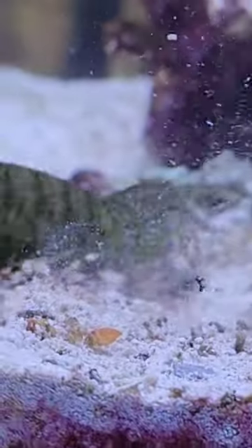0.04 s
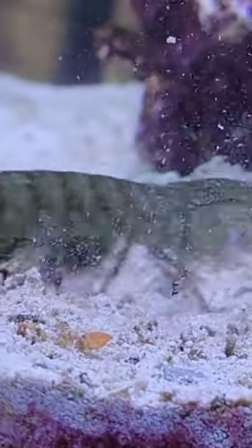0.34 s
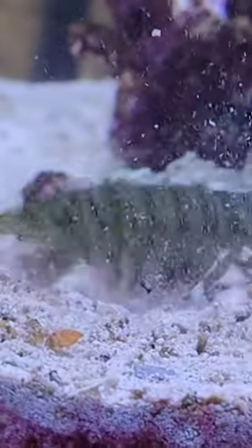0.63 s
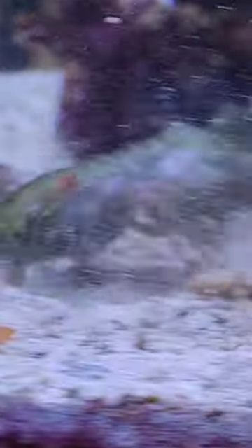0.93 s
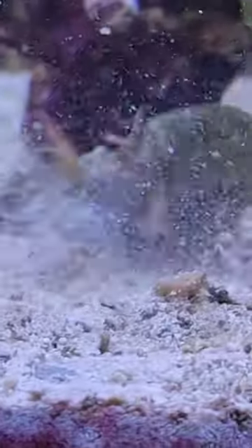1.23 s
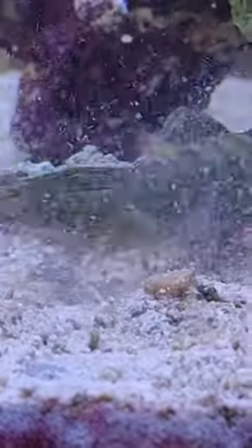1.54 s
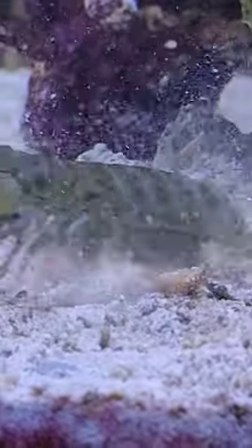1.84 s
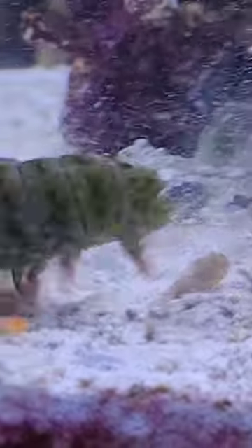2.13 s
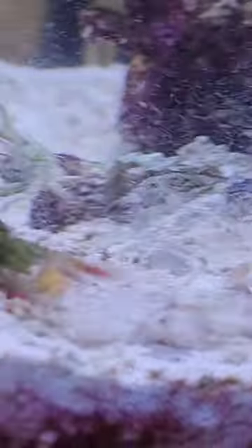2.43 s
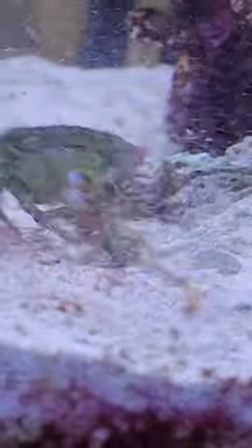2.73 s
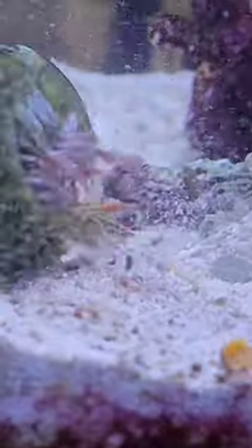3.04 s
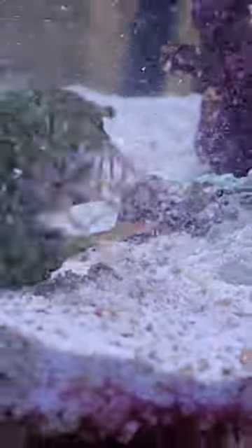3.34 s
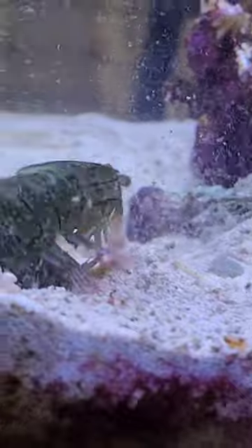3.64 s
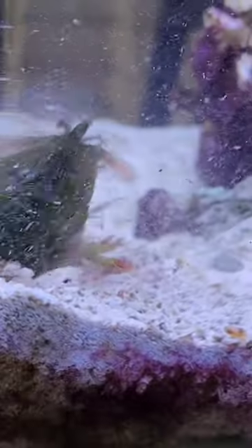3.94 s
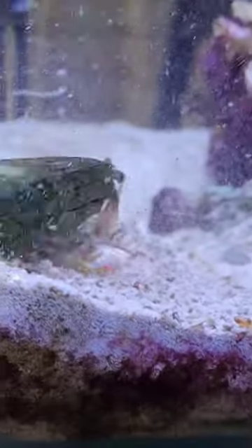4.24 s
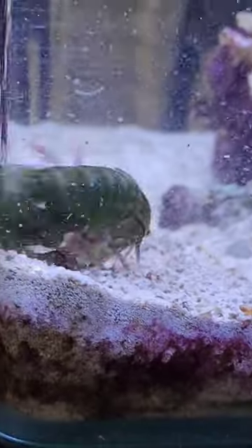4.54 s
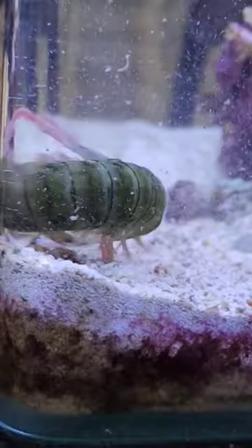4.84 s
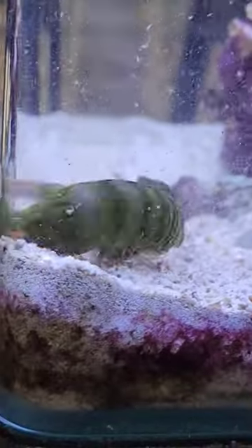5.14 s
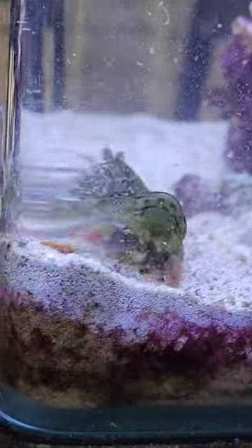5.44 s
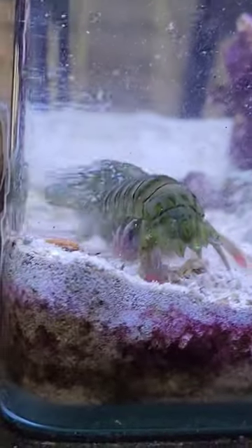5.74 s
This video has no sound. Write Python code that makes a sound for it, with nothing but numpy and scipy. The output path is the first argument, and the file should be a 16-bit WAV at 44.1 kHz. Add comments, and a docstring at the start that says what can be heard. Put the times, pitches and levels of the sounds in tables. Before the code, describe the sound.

Close to a home aquarium in a small room, a pump hums and rumbles throughout under a soft wash of water. A mantis shrimp strikes its food five times, roughly a second apart, each a sharp snap that rings briefly in the glass, the last one the loudest. In between, water swishes and gurgles, tiny bubbles trickle, sand ticks faintly and the stand gives a few dull thumps.

```python
"""Mantis shrimp in an aquarium

A mantis shrimp strikes its food five times, close by. Its club hits and a bubble collapses just
after; both snaps ring the glass panes and echo in a small room. Underneath, a pump hums and
rumbles, the stand thumps, moving water swishes and trickles with tiny bubbles, and sand ticks."""
import sys
import numpy as np
from scipy import signal
from scipy.fft import rfft, irfft
from scipy.io import wavfile
from scipy.ndimage import uniform_filter1d

SR = 44100
rng = np.random.default_rng(int(sys.argv[2]) if len(sys.argv) > 2 else 0)


def wav_out(sig):
    """Save sig, one row per channel (or a flat mono array), as 16-bit PCM at SR to the path in sys.argv[1]."""
    wavfile.write(sys.argv[1], SR, np.round(np.clip(np.atleast_2d(sig).T, -1, 1) * 32767).astype(np.int16))


N = 255780
TIME = np.arange(N) / SR
FREQS = np.maximum(np.arange(N // 2 + 1) * SR / N, 1)
TOP_HZ = 15700

# How alike left and right sound. Each row: frequency in Hz, likeness (0 unrelated, 1 the same).
LIKENESS_BY_HZ = [(60, 1), (130, 0.96), (290, 0.73), (640, 0.42), (1400, 0), (4000, 0)]
# The pump's hum, the stand's rumble, the cabinet's drone. Each row: time in seconds, relative dB.
HUM_LEVELS = [(0, -36), (3.5, -37.5), (4.6, -42.5), (5.8, -42.5)]
STAND_LEVELS = [(0, -28.5), (0.4, -29.5), (0.65, -32), (0.903, -28.5), (1.15, -30), (1.649, -29),
                (2.03, -25.5), (2.2, -29.5), (2.5, -26.5), (2.78, -26), (2.98, -24.5), (3.15, -32.5),
                (3.5, -29), (3.88, -37.5), (4.103, -32.5), (4.85, -30.5), (5.8, -32.5)]
CABINET_LEVELS = [(0, -41), (1.35, -43), (1.6, -35), (1.9, -42.5), (2.55, -31.5), (3.05, -43), (3.35, -35),
                  (4.5, -47), (5.3, -41), (5.8, -46.5)]
# Where stand, cabinet and water-filled tank ring. Each row: pitch in Hz, width in Hz, relative dB.
STAND_RINGS = [(52, 5.7, -4.5), (69.1, 24.5, 2), (90, 41, -24.5)]
CABINET_RINGS = [(115.6, 11.8, -3.5), (138, 32, -5.5), (185.5, 21, -8), (213.6, 7.3, -15)]
TANK_RINGS = [(990, 33, 7), (1130, 98, 7.5), (1334, 103, 8.5), (1486, 54, 9), (1870, 90, 5),
              (2108, 110, 8.5), (2400, 120, -5), (2620, 700, -7.5), (3554, 250, -3), (4166, 160, 3),
              (4840, 65, -5), (6080, 320, -2), (6840, 370, -4), (7730, 370, 3), (9500, 480, 1.5),
              (11300, 400, 1), (12100, 500, -3), (13100, 600, 1), (14700, 400, -1)]
# Dull thumps in the stand. Each row: middle in seconds, peak level in dB, pitch in Hz.
STAND_THUMPS = [(0.805, -22.5, 66), (1.535, -20, 72), (1.695, -18.5, 62), (2.59, -18.5, 70),
                (2.755, -16.5, 68), (2.865, -18, 72), (3.52, -18, 62), (5.352, -22.5, 62)]
# The tone of the steady wash and of the gush. Each row: frequency in Hz, relative dB.
WASH_TONE = [(20, -9), (35, 5), (100, -4.5), (200, -4.5), (320, -4), (420, -9), (550, -8), (900, -15),
             (1350, -17), (1800, -26.5), (2500, -33), (4500, -39), (7500, -39.5), (10500, -52),
             (14500, -45.5), (16000, -55)]
GUSH_TONE = [(100, -24), (220, -3.5), (320, 2), (450, -8), (650, -8.5), (1100, -16.5), (2000, -33),
             (5000, -68)]
# The strength of the steady wash. Each row: time in seconds, relative dB.
WASH_LEVELS = [(0, 5), (.8, 3.5), (1.6, 2), (2.5, 5), (3.2, 2.5), (4.3, 2), (5.1, 0.5), (5.8, 1)]
# Hollow swishes of water. Each row: middle and half length in seconds; the wash's centre in Hz,
# width in Hz and relative dB; the ring's pitch in Hz, glide in Hz per second and relative dB.
WATER_SWISHES = [(0.13, 0.12, 1080, 400, -50, 1150, -2, -56),
                 (0.425, 0.043, 890, 450, -46, 875, -100, -41.5),
                 (0.51, 0.093, 680, 506, -41.5, 612, -31, -42),
                 (0.741, 0.073, 840, 488, -45, 935, -400, -47), (0.98, 0.081, 665, 400, -52, 530, 102, -53),
                 (1.212, 0.05, 940, 300, -43, 990, -200, -45.5),
                 (1.36, 0.06, 920, 450, -49, 808, -200, -46), (1.72, 0.079, 1080, 400, -51, 1031, -1, -49),
                 (2.937, 0.12, 645, 300, -44, 635, 2, -61), (3.417, 0.094, 338, 151, -46, 335, 0.5, -43),
                 (3.738, .07, 640, 260, -42.5, 686, -2.5, -59),
                 (4.81, 0.11, 574, 352, -38, 533.4, -110, -39),
                 (5.005, 0.092, 576, 390, -38.5, 506, -38.5, -37),
                 (5.283, 0.21, 260, 103, -42, 215, -0.5, -49), (5.46, 0.17, 610, 290, -48, 670, 0, -49),
                 (5.505, 0.016, 775, 300, -58, 832, 351, -42.5),
                 (5.65, 0.16, 640, 340, -47.5, 1086, -150, -55)]
# The clearest bubbles. Each row: start in seconds, relative dB, pitch in Hz.
CLEAR_BUBBLES = [(0.3226, -50, 2720), (0.685, -43.5, 2590), (0.7532, -47, 2665), (1.031, -45, 2780),
                 (1.107, -50, 2600), (1.203, -47, 2400), (1.837, -45, 2950), (3.14, -45.5, 3060),
                 (3.473, -47, 2880), (4.2667, -46, 2750), (5.092, -46, 3040), (5.422, -48, 2810),
                 (5.642, -45.5, 1950)]
# Scraping sand and shell. Each row: start in seconds, relative dB, centre in Hz,
# reach (the band's top edge divided by its centre).
SAND_SCRAPES = [(0.358, -47.5, 12000, 1.16), (0.897, -59, 12000, 1.25), (1.39, -52, 12900, 1.1),
                (2.036, -54, 7000, 1.04), (2.09, -49, 7300, 1.05), (2.1, -55, 14000, 1.1),
                (2.347, -50.5, 12000, 1.5), (2.5, -55, 13500, 1.15), (2.686, -48, 6100, 1.03),
                (2.799, -56, 4470, 1.03), (4.18, -61, 6500, 1.3), (4.555, -50.5, 6200, 1.03),
                (5.088, -45.5, 7400, 1.05), (5.263, -45.5, 10900, 1.8)]
# The strikes. Each row: start in seconds; relative dB of knock, clack, click, ping, crack and
# sizzle; then the second snap and the first echo, in dB against the first snap.
CLUB_STRIKES = [(1.2768, -38, -39.5, -32.5, -37, -31, -30.5, -5.5, -5),
                (2.2297, -32, -33, -30.5, -44, -28, -34, -17, -6.5),
                (3.3011, -34.5, -35, -35, -37.5, -37.5, -35.5, -25, -6.5),
                (3.9515, -30.5, -28.5, -30, -50, -42, -45, -13, -16),
                (4.9024, -23, -20, -28.5, -36, -36, -31.5, -6.5, -18)]
# The six ranges, knock to sizzle. Each row: low edge in Hz, high edge in Hz, left minus right in dB.
SNAP_BANDS = [(880, 1680, .5), (1680, 3000, 4), (3000, 5200, 1.5), (5700, 6700, 3.5), (6700, 8600, 2),
              (9200, 15500, 5.5)]
# The struck shell, one row a strike. Each row: pitch in Hz and level in dB of one note, then another.
SHELL_NOTES = [(6860, -26, 6600, -22.5), (4380, -21.5, 7000, -28), (5900, -25, 9400, -28),
               (1550, -22, 4420, -27), (2120, -14.5, 2660, -15)]


def undb(db):
    """Turn decibels into a gain; a "t60" below is the seconds a sound takes to fade by 60 dB."""
    return 10 ** (np.asarray(db) / 20)


def unit(x):
    """Scale a signal to an average (rms) level of 1."""
    return x / np.sqrt(np.mean(x ** 2))


def sides(pan_db):
    """Left and right gains, with the left louder by pan_db."""
    return undb(np.array([[pan_db], [-pan_db]]) / 2)


def along_hz(points):
    """Join (Hz, value) points into a curve over all frequencies."""
    hz, value = np.transpose(points)
    return np.interp(np.log(FREQS), np.log(hz), value)


def along_time(points):
    """Join (seconds, value) points into a curve over the whole scene."""
    return np.interp(TIME, *np.transpose(points))


def resonance(hz, width_hz):
    """A gain curve that favours frequencies near hz."""
    return 1 / (1 + ((FREQS / hz - hz / FREQS) * hz / width_hz) ** 2)


def noise(gain):
    """Stereo noise shaped by a gain curve, alike on both sides only in the bass."""
    mid, side = rfft(rng.standard_normal((2, N)))
    alike = along_hz(LIKENESS_BY_HZ)
    spectrum = mid * np.sqrt(1 + alike) + np.array([[1], [-1]]) * side * np.sqrt(1 - alike)
    return unit(irfft(gain * spectrum, N))


def drift(steps_per_s):
    """A smooth random wobble, about 1 in size."""
    k = int(SR / steps_per_s)
    steps = np.repeat(rng.standard_normal(N // k + 1), k)
    return unit(uniform_filter1d(uniform_filter1d(steps, k), k)[:N])


def swell(s, half_s):
    """A smooth rise and fall around time s."""
    return np.exp(-((TIME - s) / half_s) ** 2 / 2)


def band(x, low_hz, high_hz, order):
    """Keep the sound between two frequencies."""
    return signal.sosfilt(signal.butter(order, [low_hz, high_hz], "band", fs=SR, output="sos"), x)


def add(out, s, x):
    """Mix a short stereo sound in at time s."""
    i = int(s * SR)
    out[:, i:i + x.shape[1]] += x[:, :N - i]


def room(x, echo_db, t60=0.086, treble_hz=8900):
    """A small room adds a short, slightly dull wash of echoes."""
    t = TIME[:SR // 2]
    tail = rng.standard_normal((2, len(t))) * undb(-60 * t / t60) * (1 - np.exp(-t / 0.0045))
    tail /= np.sqrt(np.sum(tail[0] ** 2))
    tail = signal.sosfilt(signal.butter(1, treble_hz, fs=SR, output="sos"), tail)
    return x + undb(echo_db) * signal.fftconvolve(x, tail, axes=1)[:, :N]


def pump(hum_hz=120, steady_s=0.39):
    """The pump hums with the mains and shakes the stand and cabinet into a throbbing rumble."""
    hum_gain = undb(along_time(HUM_LEVELS) + 1.55 * drift(7.3))
    out = hum_gain * np.sqrt(2) * np.sin(2 * np.pi * hum_hz * TIME + 0.026 * drift(5.4))
    for rings, levels, gain_db in ((STAND_RINGS, STAND_LEVELS, 0), (CABINET_RINGS, CABINET_LEVELS, 3.5)):
        shake = noise(sum(undb(db) * resonance(hz, width) for hz, width, db in rings))
        # even out slow swings but keep the quick throb
        shake /= np.sqrt(uniform_filter1d(np.mean(shake ** 2, axis=0), int(steady_s * SR)))
        out = out + shake * undb(along_time(levels) + gain_db)
    return out


def thumps(half_s=0.017):
    """The stand booms for a few cycles, the same on both sides."""
    return sum(undb(db) * swell(s, half_s) * np.sin(2 * np.pi * (hz * TIME + rng.random()))
               for s, db, hz in STAND_THUMPS)


def wash_and_hiss(gain_db=-41, flicker_db=2.1):
    """A steady wash of water, with a faint, patchy, flickering hiss above 1000 Hz."""
    wash = noise(undb(along_hz(WASH_TONE))) * undb(gain_db + along_time(WASH_LEVELS))
    spectrum = rfft(wash)
    thirds = 3 * np.log2(FREQS / 1000)
    for k in range(12):
        hiss = irfft(spectrum * np.maximum(1 - np.abs(thirds - k), 0), N)
        flicker = undb(flicker_db * drift(36)) * sides(1.55)
        wash += hiss * (flicker - 1)  # swap the steady hiss for a flickering one
    return wash


def gurgle(hz, width_hz=25.2):
    """Swirling water drives a narrow, fluttering ring whose pitch follows hz."""
    slow = signal.butter(2, width_hz / 2, fs=SR, output="sos")
    flutter = signal.sosfilt(slow, rng.standard_normal((2, N)))
    ring = np.real((flutter[0] + 1j * flutter[1]) * np.exp(2j * np.pi * np.cumsum(hz) / SR))
    return ring / np.sqrt(uniform_filter1d(ring ** 2, SR // 6) + 1e-18)


def swishes(gush_db=-34, churn_db=2.5):
    """Churning water swells into hollow washes and gurgles, with one wide gush as the animal darts by."""
    out = noise(undb(along_hz(GUSH_TONE))) * undb(gush_db) * swell(s=2.452, half_s=0.135)
    swirl = rfft(noise(1))
    for s, half_s, hz, width_hz, db, ring_hz, glide_hz_per_s, ring_db in WATER_SWISHES:
        wash = unit(irfft(swirl * resonance(hz, width_hz), N)) * undb(db)
        ring = gurgle(ring_hz + glide_hz_per_s * (TIME - s)) * undb(ring_db - 1)
        out += (wash + ring) * swell(s, half_s)
    return out * undb(churn_db * drift(30))


def bubble(hz, t60, glide=0.015):
    """A small bubble rings briefly and rises in pitch as it surfaces."""
    t = TIME[:SR // 10]
    ring = np.sin(2 * np.pi * hz * t * (1 + glide * t / t60 / 2) + rng.uniform(0, np.pi, (2, 1)))
    return ring * undb(-60 * t / t60) * (1 - np.exp(-t / 0.00076))


def trickle(soft_count=9, soft_hz=3070, spread_octaves=0.39, fizz_count=800, fizz_cycles=32):
    """A few clear bubbles and some softer ones of similar size ring over a faint fizz of many more."""
    out = np.zeros((2, N))
    soft = [(when * N / SR, -55, soft_hz * 2 ** (spread_octaves * (2 * pitch - 1)))
            for when, pitch in rng.random((soft_count, 2))]
    for s, db, hz in CLEAR_BUBBLES + soft:
        add(out, s, bubble(hz, t60=0.044) * undb(db - 3) * sides(11.4))
    for when, pitch, chance in rng.random((fizz_count, 3)):
        octaves = 2.3 * pitch
        hz = 1650 * 2 ** octaves
        db = -63 + 4.5 * octaves + 7 * min(-np.log(chance), 2)  # high ones get more gain but die sooner
        add(out, when * N / SR, bubble(hz, fizz_cycles / hz) * undb(db) * sides(1.5))
    return room(out, echo_db=-1)


def sand(t60=0.064, rise_s=0.0071, settling_count=100):
    """The animal shifts sand in clusters of gritty ticks, and stirred-up grains settle faintly."""
    out, t = np.zeros((2, N)), TIME[:SR // 6]
    settling = [(when * N / SR, -61 + 5 * size, 3200 * 2 ** (2.1 * pitch), 1.09)
                for when, size, pitch in rng.random((settling_count, 3))]
    for s, db, hz, reach in SAND_SCRAPES + settling:
        grit = rng.standard_normal((2, len(t))) * rng.exponential(size=len(t))
        grit = unit(band(grit, hz / reach, hz * reach, order=1))
        loudness = undb(db + 1 - 60 * t / t60) * (1 - np.exp(-t / rise_s))
        add(out, s, grit * loudness * sides(4))
    return room(out, echo_db=7)


def panes(x, direct_db):
    """The glass and the water ring as a sound passes through; direct_db sets how much skips them."""
    out = undb(direct_db) * x
    for hz, width_hz, db in TANK_RINGS:
        out += undb(db) * signal.lfilter(*signal.iirpeak(hz, hz / width_hz, fs=SR), x)
    return out


def shell_note(t, hz, t60=0.024, rise_s=0.0003, blur_share=0.015):
    """The bit of shell under the club rings briefly, slightly blurred in pitch."""
    blur = np.cumsum(rng.standard_normal(len(t))) * np.sqrt(2 * np.pi * hz * blur_share / SR)
    phase = rng.uniform(0, 2 * np.pi) + 1.22 * rng.standard_normal((2, 1))  # differs left and right
    loudness = undb(-60 * t / t60) * (1 - np.exp(-t / rise_s))
    return loudness * np.sin(2 * np.pi * hz * t + phase + blur)


def double_snap(t, second_db, echo_db, collapse_s=0.0034, echo_s=0.0095, burst_t60=0.025, room_t60=0.24):
    """The club hits, then the vapour bubble made by its speed collapses; tank and room echo both."""
    arrivals = ((0, 0), (collapse_s, second_db), (echo_s, echo_db))
    # dense reflections in the tank follow each arrival with a burst of noise
    power = sum((t >= lag_s) * undb(db - 60 * (t - lag_s) / burst_t60) ** 2 for lag_s, db in arrivals)
    hit = rng.standard_normal((2, len(t))) * np.sqrt(power)
    # each snap's sharp front reaches the right side 4 samples after the left
    for lag_s, db in arrivals[:2]:
        i = int(lag_s * SR)
        hit[[0, 1], [i, i + 4]] += undb(15.5 + db)
    room_tail = rng.standard_normal((2, len(t))) * undb(-18 - 60 * t / room_t60)
    return panes(hit, direct_db=-24) + panes(room_tail, direct_db=-1)


def strikes(top_loss_db_per_s=120):
    """Each strike is a double snap and two shell notes; what the club hits sets the tone."""
    out, t = np.zeros((2, N)), TIME[:SR // 3]
    for (s, *levels_db, second_db, echo_db), notes in zip(CLUB_STRIKES, SHELL_NOTES):
        snap = double_snap(t, second_db, echo_db)
        for (low_hz, high_hz, pan_db), db in zip(SNAP_BANDS, levels_db):
            part = band(snap, low_hz, high_hz, order=4)
            part *= undb(-top_loss_db_per_s * t * high_hz / TOP_HZ)  # treble is absorbed sooner
            part /= part[:, :SR // 100].std(axis=1, keepdims=True)  # the first 10 ms set the level
            add(out, s, part * undb(db - 0.5) * sides(pan_db))
        for hz, db in (notes[:2], notes[2:]):
            add(out, s, shell_note(t, hz) * undb(db) * sides(5))
    return out


def scene():
    """Everything in and around the tank."""
    return pump() + thumps() + wash_and_hiss() + swishes() + trickle() + sand() + strikes()


def record(dry):
    """Cut away the highest treble."""
    return signal.sosfilt(signal.ellip(10, .2, 80, TOP_HZ, fs=SR, output="sos"), dry)


dry = scene()
out = record(dry)
wav_out(out)
```